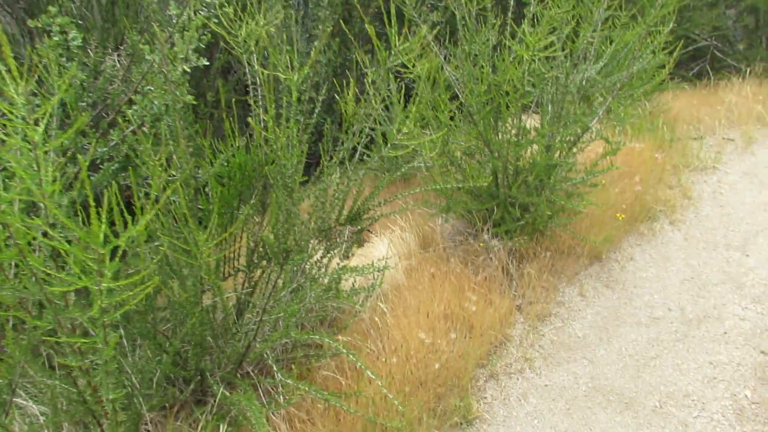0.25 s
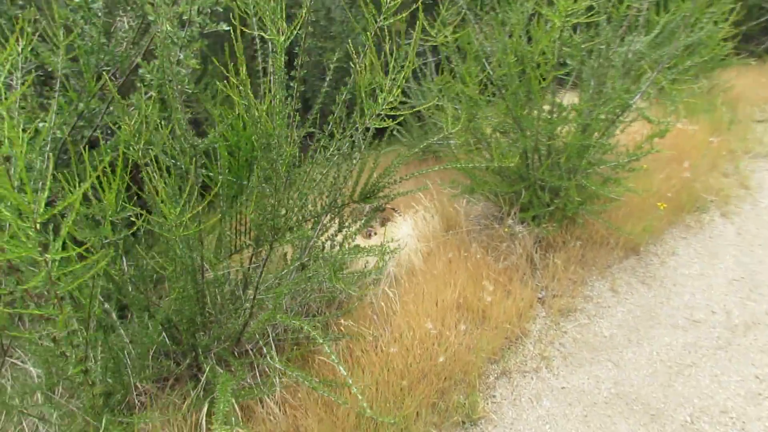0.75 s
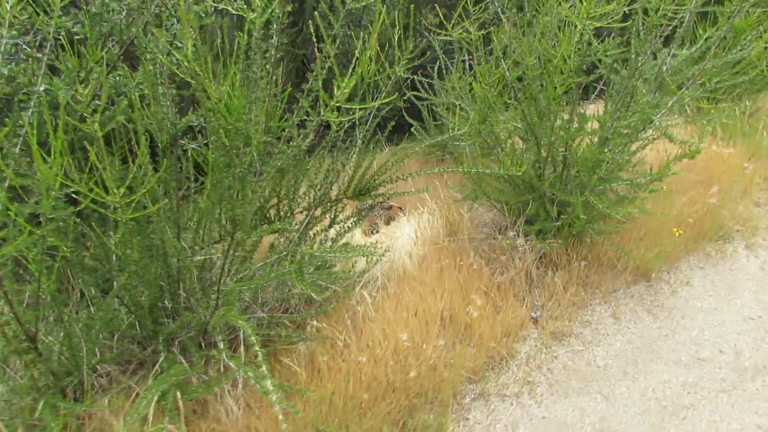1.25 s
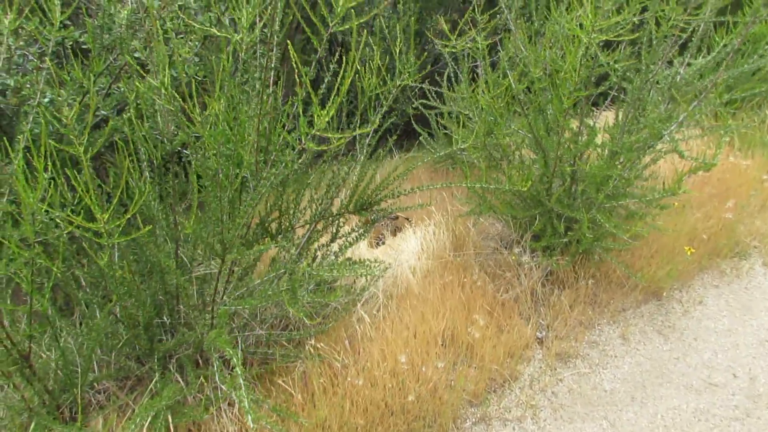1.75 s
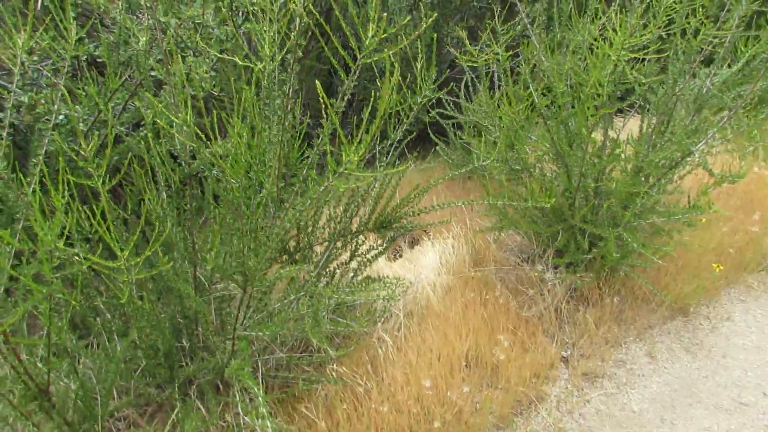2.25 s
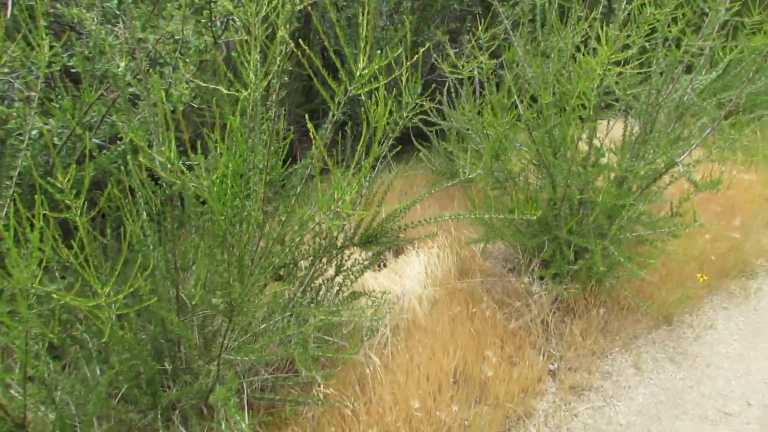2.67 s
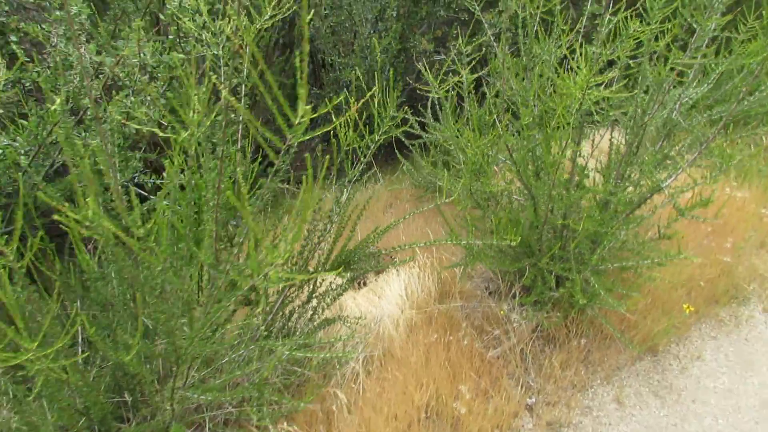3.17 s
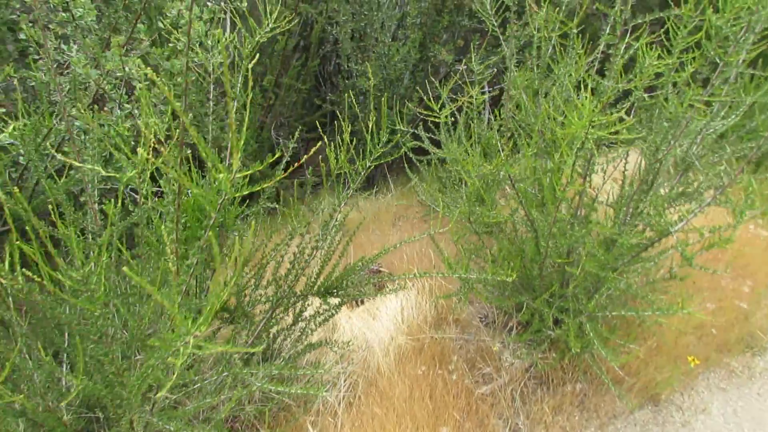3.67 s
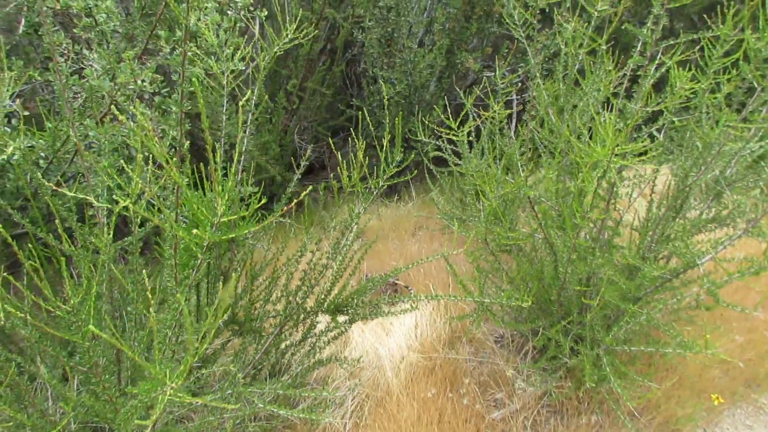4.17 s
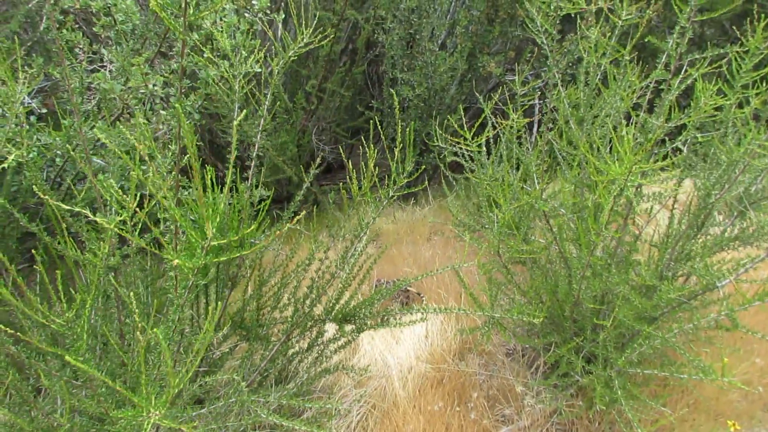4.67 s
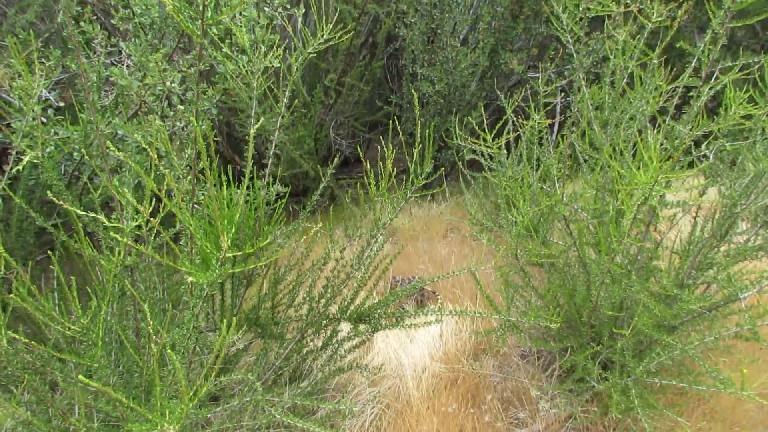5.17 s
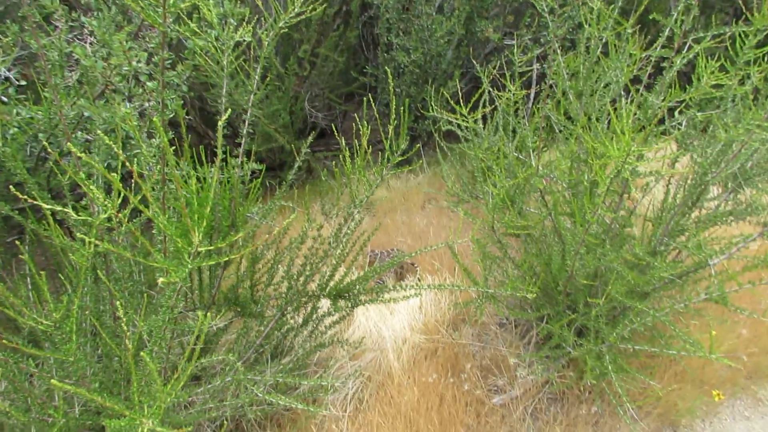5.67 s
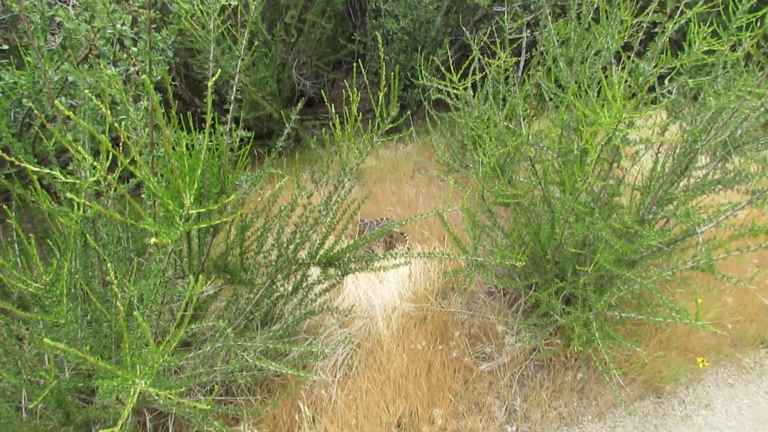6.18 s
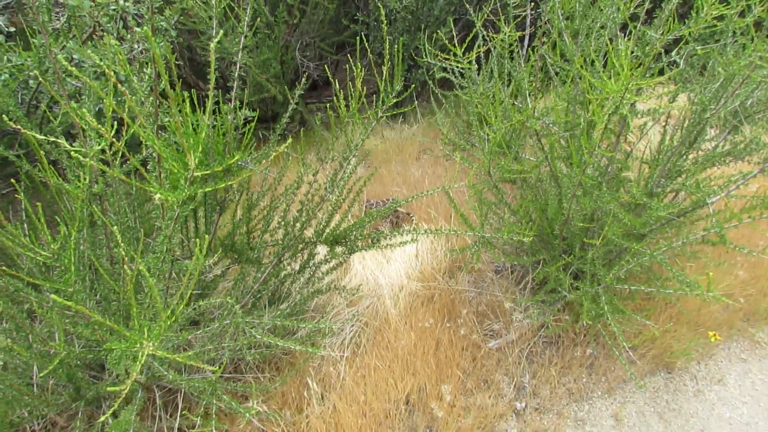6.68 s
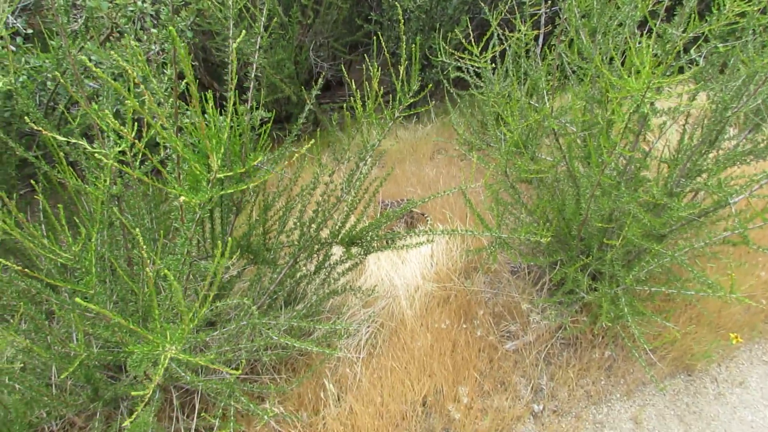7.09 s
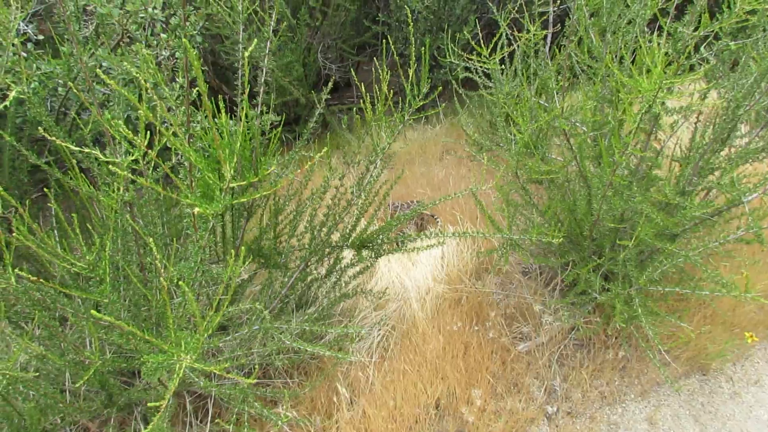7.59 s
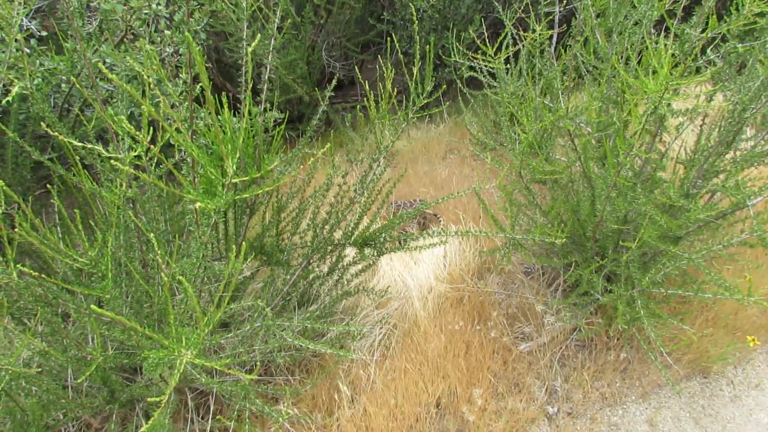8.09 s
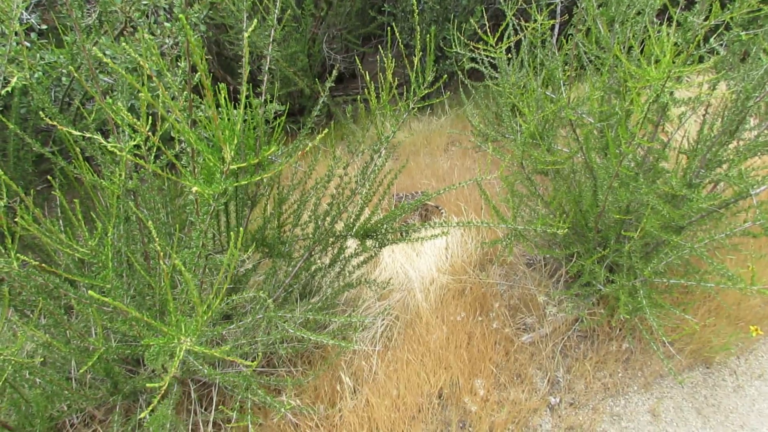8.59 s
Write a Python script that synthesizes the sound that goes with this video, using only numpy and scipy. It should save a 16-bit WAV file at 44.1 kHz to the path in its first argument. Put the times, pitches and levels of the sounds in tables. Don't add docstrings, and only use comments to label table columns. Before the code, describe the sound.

A rattlesnake's tail buzzes without a break, dry, bright and hissing, over faint distant traffic hum, with sharp plastic clicks around two seconds.

```python
import sys
import numpy as np
from scipy import signal
from scipy.fft import irfft
from scipy.io import wavfile
from scipy.ndimage import uniform_filter1d

SR = 44100
rng = np.random.default_rng(int(sys.argv[2]) if len(sys.argv) > 2 else 0)


def output_pcm(signal):
    pcm = np.clip(np.atleast_2d(signal).T, -1, 1) * 32767
    wavfile.write(sys.argv[1], SR, np.round(pcm).astype(np.int16))


def invert_db(level):
    return 10 ** (np.asarray(level, dtype=float) / 20)


N = 389403
FRAME = 512
BIN_HZ = np.fft.rfftfreq(FRAME, 1 / SR)

# time in seconds, level in dB.
RATTLE_LEVEL = [(0.0, -29.5), (0.14, -31), (0.29, -30), (2.97, -30), (3.69, -29), (3.96, -29.5),
                (6.64, -28), (8.83, -27.5)]
# time in seconds, turn away (0 to 1), cover of leaves (-1 to 1).
STANCE = [(0, 0, 0.55), (.6, 0, 0.49), (1.2, 0.15, 0.53), (1.8, .23, .47), (2.4, 0.8, .81), (3.05, 1, 0.92),
          (3.3, 1.01, 0.49), (4, 0.63, -0.13), (4.6, 0.54, -.57), (5.2, 0.55, -0.51), (5.8, 0.4, -.74),
          (6.4, 0.6, -.61), (7, 0.7, -0.5), (8.83, 0.6, -0.51)]
# time in seconds, swings per second.
SWING_RATE = [(0, 58), (1, 51), (1.9, 54.5), (3, 61), (4.2, 59), (6, 55.4), (7.2, 54.3), (8.83, 52.7)]
# frequency in Hz, density in dB per Hz.
KNOCK_COLOUR = [(1120, -65), (1900, -23), (2300, -11.5), (3400, -8.5), (6000, 0.6), (10000, -9),
                (15500, -8.5)]
# centre in Hz, width in Hz, height in dB.
SEGMENT_RESONANCES = [(3700, 110, 0.9), (4100, 77, -1.5), (4760, 100, 2.5), (6240, 70, 2.5), (9300, 170, 2),
                      (14400, 150, -2.2), (15550, 300, 0)]
# centre in Hz, width in Hz,
# height in dB, change in dB per unit of turn, change in dB per unit of cover.
PATH_RESONANCES = [(2450, 120, 1.7, -1, 3), (2840, 180, -2.1, 1, -2), (3630, 390, 5.5, -2, -0.4),
                   (4246, 240, -1.5, -4.5, 4.5), (4840, 556, 11, -5.5, 3.5), (5358, 535, -11, -3.5, -0.8),
                   (5750, 465, 6.5, 2, -3), (6800, 140, 0.5, 0.7, -2.1), (8140, 490, 1.6, -5.5, 2.4),
                   (9470, 470, 6.5, -5.5, 0), (11640, 540, -0.7, -4, 4.5), (12430, 690, 6, -1, -4),
                   (14600, 240, 1.5, -2, 6), (15300, 500, 5.5, -10.5, .7)]
# frequency in Hz, level in dB under the mean colour.
STRAY = [(2200, -8), (4500, -4.5), (7500, -10.5), (15000, -8.5)]
# delay in ms, share (ratio), turn in radians.
BODY_ECHOES = [(.229, .2, .55), (.312, .12, 2.23), (.605, .195, 1.85), (.778, .09, .5)]
AHEAD_RAD, LAG_MS = .27, .0083

# frequency in Hz, density in dB per Hz.
HUM_COLOUR = [(15, -35), (27, -2), (55, 0.4), (110, -3), (600, -8.5), (1000, -9.5), (1900, -17),
              (4180, -100)]
# frequency in Hz, likeness (0 to 1).
HUM_LIKENESS = [(40, .45), (130, .35), (350, .68), (1000, .8), (1500, .68), (2200, .5)]
# frequency in Hz, left lead in radians.
HUM_LEAD = [(40, .6), (300, 1.0), (1000, 1.7), (1900, 2.3)]
# frequency in Hz, left over right in dB.
HUM_TILT = [(40, -3), (250, 0), (700, 4), (1400, 5.8), (2200, 4)]
HUM_DB = -44
SWELL_S, SWELL_WIDTH_S, SWELL_DB = 4.3, 2.5, 1.5

# start in seconds, ring level in dB, ring pitch in Hz,
# left over right of the ring in dB, tick level in dB.
CREAKS = [(1.484, -29, 1600, 7, -38), (2.0113, -24, 1500, 8, -28), (2.01275, -16, 1600, 9, -19),
          (2.02035, -17.5, 1690, 8, -14), (2.0274, -20.5, 1650, 8, -18), (2.0338, -28, 1600, 7, -25),
          (2.061, -35, 2210, 0, -36), (2.1745, -21.5, 1570, 8, -22), (2.226, -30.5, 1800, 6, -24),
          (2.238, -26, 2010, 6, -26), (2.599, -32, 702, -2, -45), (5.663, -36, 450, 0, -60),
          (5.72, -36, 220, 0, -60), (7.756, -42, 1600, 6, -40)]
RING_T60_CYCLES = 12.5


def evened(x):
    return x / np.sqrt(np.mean(abs(x) ** 2) + 1e-20)


def read(points, hz):
    point_hz, value = np.transpose(points)
    return np.interp(np.log(hz + 1), np.log(point_hz + 1), value)


def bump(centre_hz, width_hz):
    return np.exp(-.5 * ((BIN_HZ - centre_hz) / width_hz) ** 2)


def causal(gain_db):
    log_gain = np.log(invert_db(np.maximum(gain_db, -100)))
    circle = np.concatenate([log_gain, log_gain[-2:0:-1]])
    return np.exp(np.conj(signal.hilbert(circle, axis=0)))[:len(gain_db)]


def ports(direct, diffuse, same, log_ratio):
    mean = np.sqrt(2 * np.cosh(log_ratio.real) + 2 * same * np.cos(log_ratio.imag)) / 2
    common = np.sqrt((1 + same) / 2) * direct
    opposed = np.sqrt((1 - same) / 2) * diffuse
    left = np.exp(log_ratio / 2) * (common + opposed)
    right = np.exp(-log_ratio / 2) * (common - opposed)
    return np.array([left, right]) / mean


def knocks(lag_swings=.36, jitter_swings=.05, spread_db=1.1, uneven_db=0.55, narrow=0.23,
           broad_db=-17, wander_db=1.0, joints=30):
    t = np.arange(N) / SR
    swings = np.cumsum(np.interp(t, *np.transpose(SWING_RATE))) / SR
    ends = np.arange(-2, 1100)
    out, power = np.zeros(N), np.zeros(len(BIN_HZ))
    pitches_hz = rng.permutation(np.linspace(50, 124, joints) ** 2)
    for joint, pitch_hz in enumerate(pitches_hz):
        late = rng.standard_normal(len(ends))
        size = rng.exponential(1, len(ends))
        drift = rng.standard_normal(len(ends))
        place = ends / 2 + lag_swings * joint / joints + jitter_swings * late
        wander = evened(uniform_filter1d(drift, size=3) - uniform_filter1d(drift, size=12))
        size_db = spread_db * np.minimum(size, 4) + wander_db * wander
        size_db += uneven_db * (-1.) ** ends
        inside = (place > 0) & (place < swings[-1])
        at = np.interp(place, swings, t * SR).astype(int)
        train = np.bincount(at[inside], invert_db(size_db)[inside], N)
        off_pitch = np.log(BIN_HZ / pitch_hz + 1e-9) / narrow * np.sqrt(pitch_hz / 4000)
        hollow = invert_db(broad_db) + np.exp(-.5 * off_pitch ** 2)
        out += signal.oaconvolve(train, np.roll(irfft(hollow), 64)[:128])[:N]
        power += hollow ** 2
    return out, power


def rattle(far_scatter_db=-0.5, near_scatter_db=-3.0, scatter_s=0.0086, patchy_db=1.0):
    x, power = knocks()
    envelope = np.sqrt(abs(uniform_filter1d(x ** 2, int(scatter_s * SR))))
    blur = envelope * rng.standard_normal((2, N))
    _, t, z = signal.stft(np.vstack([x, blur]), SR, nperseg=FRAME, noverlap=FRAME * 3 // 4)
    sharp = evened(z[0] / np.sqrt(power)[:, None])
    shared, unshared = evened(z[1]), evened(z[2])
    scatter = invert_db(np.interp(t, [0, N / SR], [far_scatter_db, near_scatter_db]))
    direct = (sharp + scatter * shared) / np.hypot(1, scatter)

    s, turn, cover = np.transpose(STANCE)
    turn, cover = np.interp(t, s, turn), np.interp(t, s, cover)
    colour_db = read(KNOCK_COLOUR, BIN_HZ)
    colour_db = colour_db + sum(db * bump(hz, width_hz) for hz, width_hz, db in SEGMENT_RESONANCES)
    colour_db = colour_db[:, None] + sum(
        np.outer(bump(hz, width_hz), db + turn_db * turn + cover_db * cover)
        for hz, width_hz, db, turn_db, cover_db in PATH_RESONANCES)
    colour_db -= 10 * np.log10(np.mean(invert_db(colour_db) ** 2, 0))

    stray_db = np.minimum(read(STRAY, BIN_HZ)[:, None] - colour_db, 10)
    same = 1 / (1 + invert_db(stray_db) ** 2)
    rad_per_ms = 2 * np.pi * BIN_HZ / 1000
    log_ratio = 1j * (AHEAD_RAD - rad_per_ms * LAG_MS)
    log_ratio = log_ratio + sum(share * np.exp(1j * (rad - rad_per_ms * ms)) for ms, share, rad in BODY_ECHOES)

    patches = uniform_filter1d(rng.standard_normal(colour_db.shape[::-1]), size=13, axis=0)
    patches = uniform_filter1d(patches, size=2, axis=1)
    colour_db += patchy_db * evened(patches).T
    pair = ports(direct, unshared, same, log_ratio[:, None]) * causal(colour_db)
    pair = signal.istft(pair, nperseg=FRAME, noverlap=FRAME * 3 // 4)[1][:, :N]
    s, level_db = np.transpose(RATTLE_LEVEL)
    return pair / np.std(pair.mean(0)) * invert_db(np.interp(np.arange(N) / SR, s, level_db))


def hum(patchy_db=0.34):
    frames, hz = N // 512 + 5, np.fft.rfftfreq(2048, 1 / SR)
    a, b, c, d, patches = rng.standard_normal((frames, len(hz), 5)).T
    patches = uniform_filter1d(patches, size=16, axis=0)
    patches = evened(uniform_filter1d(patches, size=10, axis=1))
    log_ratio = np.log(invert_db(read(HUM_TILT, hz))) + 1j * read(HUM_LEAD, hz)
    z = ports(a + 1j * b, c + 1j * d, read(HUM_LIKENESS, hz)[:, None], log_ratio[:, None])
    z *= invert_db(read(HUM_COLOUR, hz)[:, None] + patchy_db * patches)
    frame_s = np.arange(frames) * 512 / SR
    z *= invert_db(SWELL_DB * np.exp(-.5 * ((frame_s - SWELL_S) / SWELL_WIDTH_S) ** 2))
    pair = signal.istft(z, nperseg=2048, noverlap=1536)[1][:, :N]
    return invert_db(HUM_DB) * pair / np.std(pair.mean(0))


def creaks(low_hz=1000, low_db=-10, tick_hz=2120, tick_t60_s=.005, rise_s=.00025):
    out, t = np.zeros((2, N)), np.arange(1500) / SR
    side = np.array([[.5], [-.5]])
    rise = 1 - np.exp(-t / rise_s)
    for s, ring_db, hz, pan_db, tick_db in CREAKS:
        ring = np.sin(2 * np.pi * hz * t) + invert_db(low_db) * np.sin(2 * np.pi * low_hz * t)
        ring = invert_db(ring_db + side * pan_db - 60 * t * hz / RING_T60_CYCLES) * ring
        tick = invert_db(tick_db - 60 * t / tick_t60_s) * np.sin(2 * np.pi * tick_hz * t)
        at = round(s * SR)
        out[:, at:at + len(t)] -= (ring + tick) * rise
    return out


def scene():
    return rattle() + hum() + creaks()


def band_limit(x):
    return signal.sosfilt(signal.butter(12, 15910, fs=SR, output="sos"), x)


def record(dry):
    edge = signal.firwin(1023, 15715, window=("kaiser", 9), fs=SR)
    mix = signal.oaconvolve(dry, edge[None], "same")
    return band_limit(mix)


dry = scene()
out = record(dry)
output_pcm(out)
```